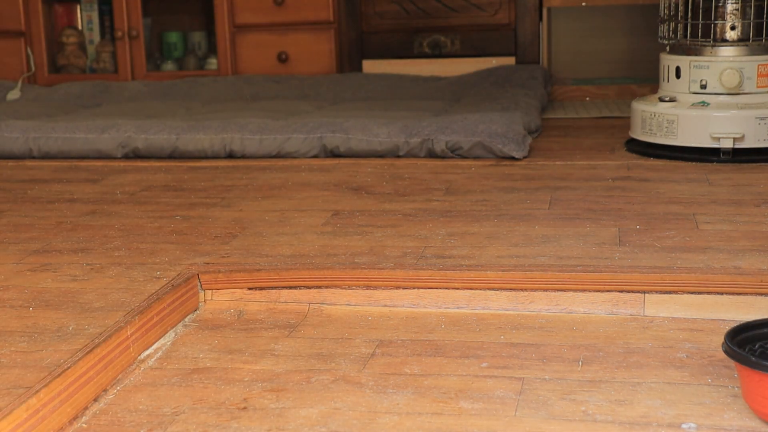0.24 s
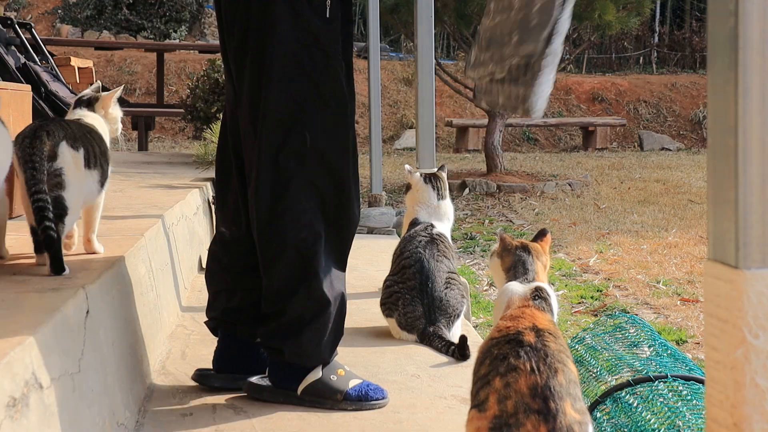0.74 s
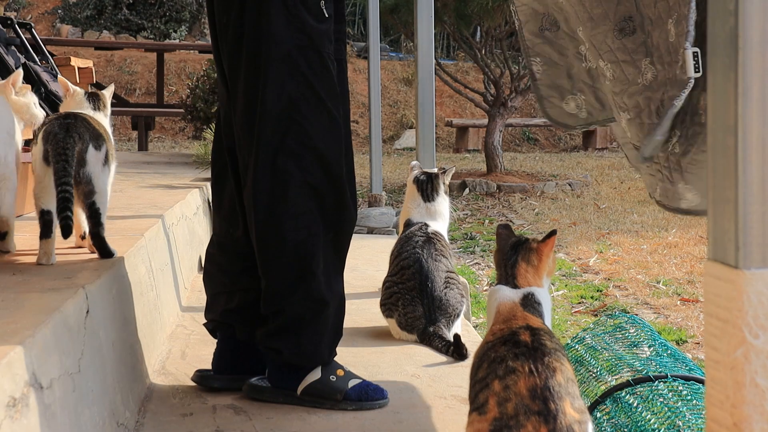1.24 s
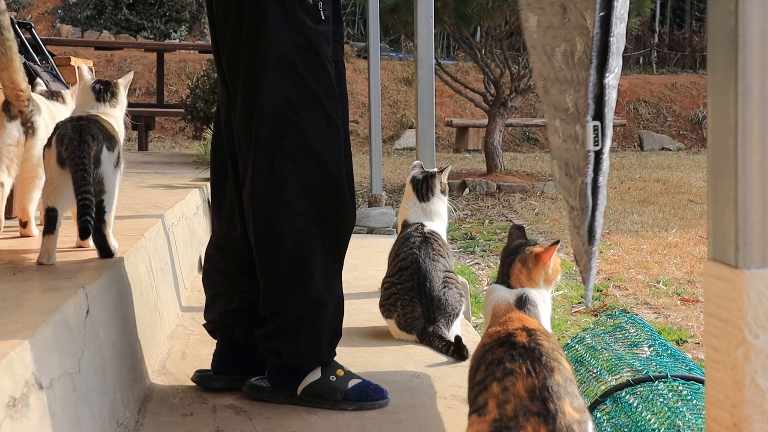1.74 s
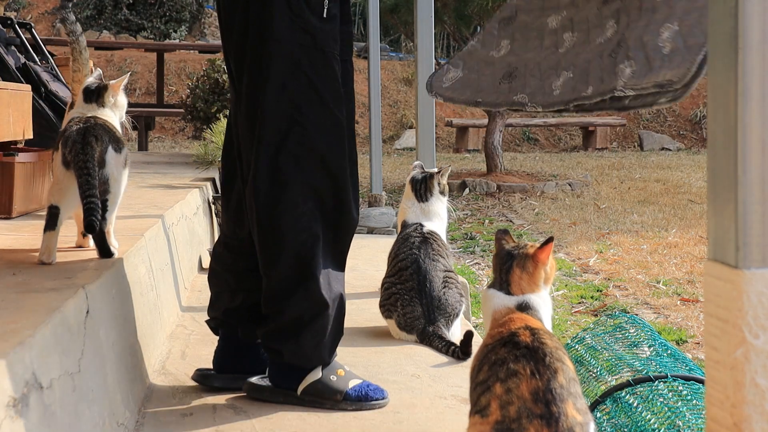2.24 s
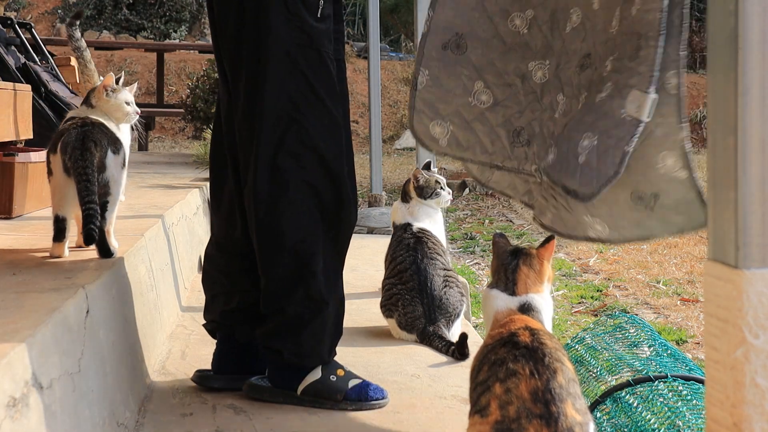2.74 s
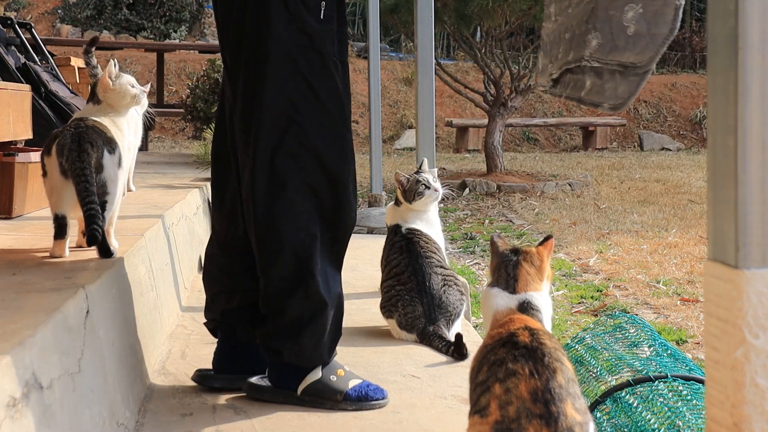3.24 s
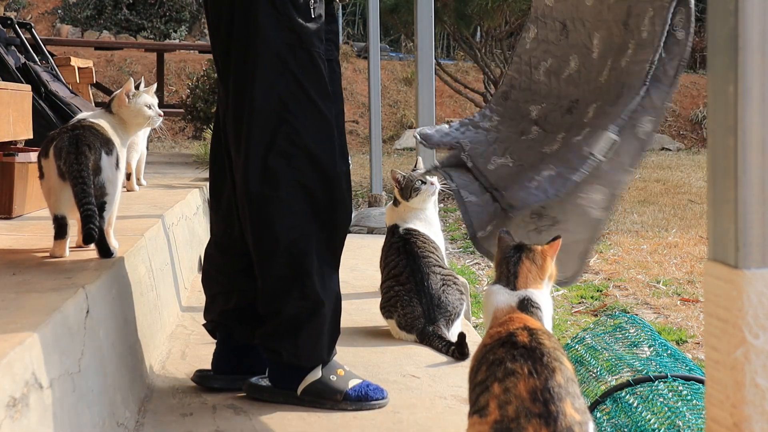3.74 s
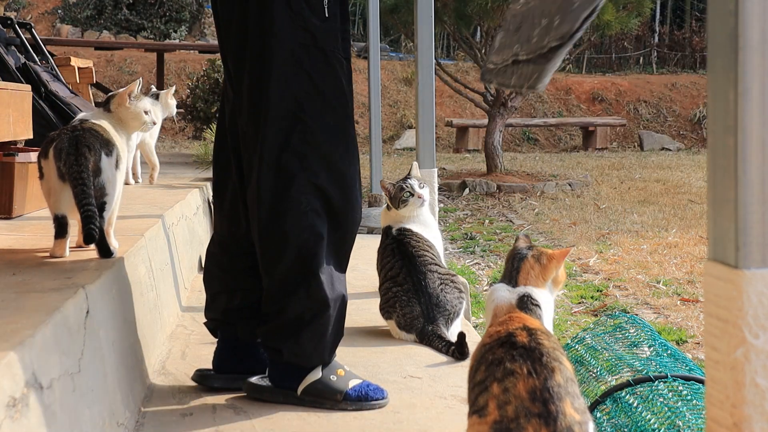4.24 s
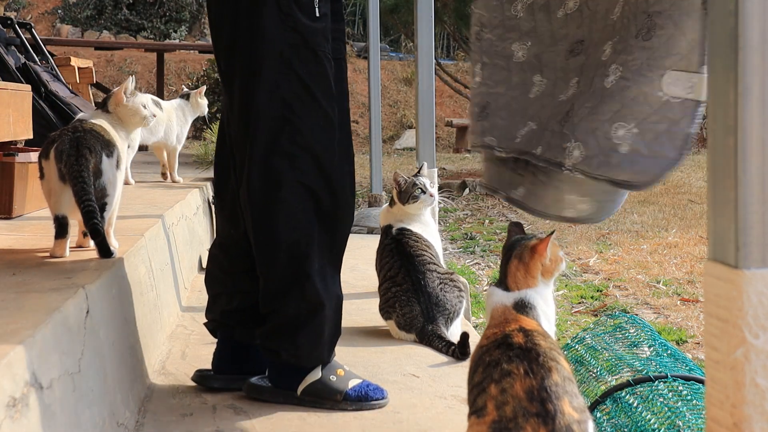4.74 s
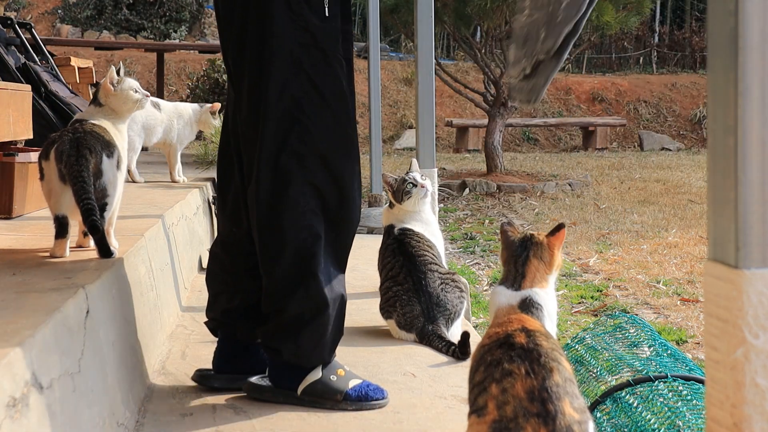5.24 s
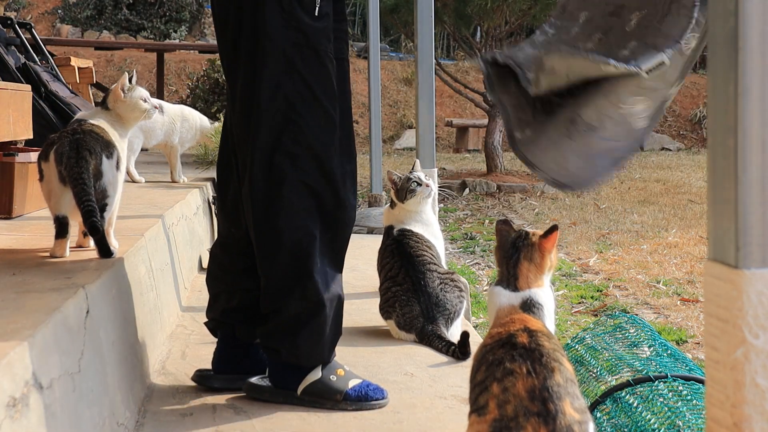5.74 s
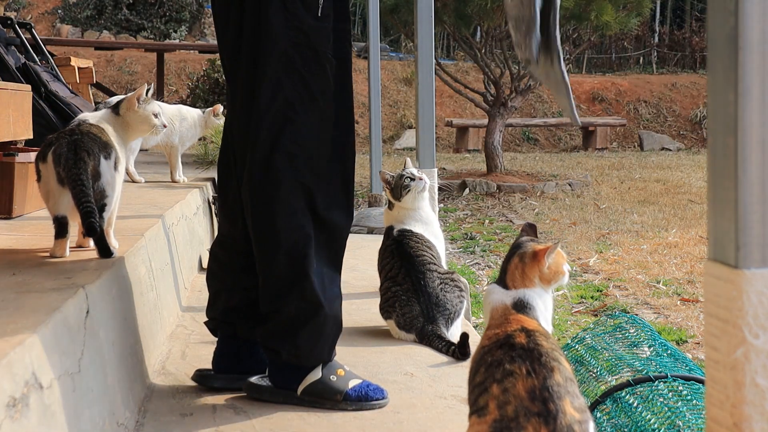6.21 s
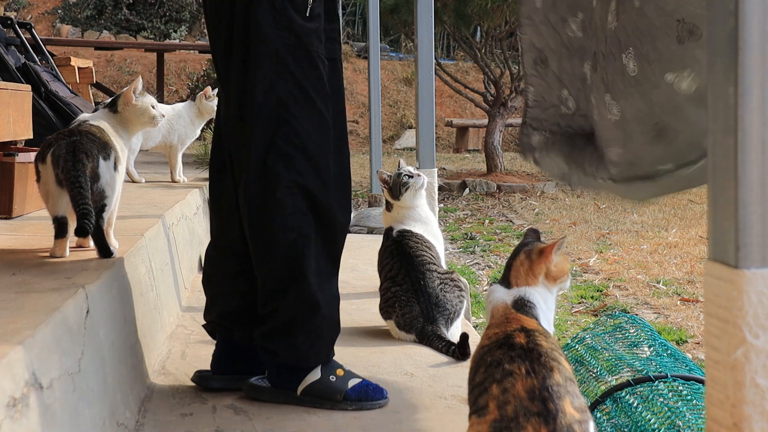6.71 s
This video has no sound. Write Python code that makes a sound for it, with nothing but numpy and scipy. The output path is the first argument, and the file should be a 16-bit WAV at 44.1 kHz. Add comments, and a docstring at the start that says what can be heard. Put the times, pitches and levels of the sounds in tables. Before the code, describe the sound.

Someone shakes out a heavy blanket on a porch, close to the microphone. Each shake draws up with a rustle, pops taut, then whooshes over and cracks with a thump, slapping off nearby walls. A raspy magpie calls three double notes near the beginning, echoing lightly across the yard; a low, quiet outdoor air sound continues throughout.

```python
"""A blanket is shaken out on a porch about once a second, while a magpie gives three harsh double calls.
In each shake the cloth is drawn up with a rustle, pops taut twice, then turns over with a rush and a
thump as the hem cracks. Pops and cracks are coloured bursts with fading ripples, in a resonant porch;
rustle and rush are shaped noise. The magpie is uneven pulses and rasp through a throat filter, with
an echo from a far wall. Underneath lies the quiet rumble and hiss of a yard, made of filtered noise."""
import sys
import numpy as np
from scipy import signal
from scipy.fft import rfft, irfft
from scipy.io import wavfile
from scipy.ndimage import uniform_filter1d

SR = 44100
rng = np.random.default_rng(int(sys.argv[2]) if len(sys.argv) > 2 else 0)


def pcm_store(signal):
    """Save signal as 16-bit PCM."""
    levels = np.round(np.clip(np.atleast_2d(signal), -1, 1) * 32767)
    wavfile.write(sys.argv[1], SR, levels.astype(np.int16).T)


N = 307377
T = np.arange(N) / SR  # time [s]
HZ = np.maximum(np.fft.rfftfreq(8192, 1 / SR), 1)  # frequency grid of the colour filters [Hz]

# one row per shake of the blanket: (tug time [s], drawing rustle [dB], tug level [dB], tug bass [dB],
# tug brightness [dB], turn-over time [s], air rush [dB], thump relative to its cracks [dB], thump pitch [Hz])
SHAKES = [(1.104, -38.5, -12.5, -3.5, -10, 1.232, -32, -9, 125),
          (2.438, -45, -20, 2.5, -1, 2.578, -29, -20, 280), (3.551, -44, -23, -7, 11, 3.66, -30, -4, 115),
          (4.598, -51, -11, -9, -2, 4.7, -30.5, -3, 179),
          (5.621, -46.5, -13.5, -2.5, 4, 5.726, -28.5, -1.5, 138),
          (6.680, -44, -18.5, -0.5, 3.5, 6.84, -31, -2.5, 135)]


def undb(db):
    """Decibels to gain."""
    return 10 ** (np.asarray(db) / 20)


def unit(x):
    """Scale to rms 1."""
    return x / np.sqrt(np.mean(x ** 2))


def convolve(x, response):
    """Pass a sound through a response, keeping its length."""
    return signal.fftconvolve(x, response)[:len(x)]


def spectrum(points):
    """Join (frequency [Hz], level [dB]) points on a log-frequency axis."""
    hz, db = np.transpose(points)
    return np.interp(np.log(HZ), np.log(hz), db)


def causal(db):
    """Minimum-phase response with the given gains [dB], made by folding the cepstrum."""
    cepstrum = irfft(db * np.log(10) / 20)
    half = len(cepstrum) // 2
    cepstrum[1:half] *= 2
    cepstrum[half + 1:] = 0
    return irfft(np.exp(rfft(cepstrum)))


def ring(x, modes):
    """The sound plus its ringing in resonances: (frequency [Hz], width [Hz], level [dB])."""
    ringing = 0
    for hz, width, db in modes:
        ringing = ringing + undb(db) * signal.lfilter(*signal.iirpeak(hz, hz / width, SR), x)
    return x + ringing


def add(out, s, sound):
    """Mix a sound in at time s."""
    i = int(s * SR)
    out[i:i + len(sound)] += sound[:N - i]


def swell(peak, rise, fall, curve):
    """An envelope that rises to 1 at its peak time and falls back; curve bends both slopes."""
    return np.interp(T - peak, [-abs(rise), 0, abs(fall)], [0, 1, 0]) ** abs(curve)


def walk(rate):
    """Random drift with a spread of 1, through new levels at the given rate [per second]."""
    levels = rng.standard_normal(2048)
    return unit(np.interp(T * rate, np.arange(len(levels)), levels))


def fibres(spread_db):
    """Dense tiny slips: noise whose strength jumps every 16 samples."""
    size = np.repeat(undb(spread_db * rng.exponential(size=N // 16 + 1)), 16)[:N]
    return size * rng.standard_normal(N)


def reverb(x, low_t60, high_t60, delay):
    """Diffuse tail in eight bands, with decay times [s] from low to high and a build-up time [s]."""
    t, response = T[:SR], 0
    edges = np.geomspace(50, 16000, 9)
    for lo, hi, t60 in zip(edges, edges[1:], np.geomspace(low_t60, high_t60, len(edges) - 1)):
        bandpass = signal.butter(2, [lo, hi], "band", fs=SR, output="sos")
        band = signal.sosfilt(bandpass, rng.standard_normal(SR))
        response = response + band * np.exp(-np.log(1000) * t / t60) / np.sqrt(t60)
    response = response * (1 - np.exp(-(t / delay) ** 2))
    return convolve(x, response / np.linalg.norm(response))


def yard():
    """Quiet outdoor air: a fluttering low rumble under a smooth distant hiss."""
    # colour of the open air: (frequency [Hz], level [dB])
    air_colour = [(15, -34), (25, -13), (45, 0), (105, -0.5), (270, -4), (460, -8.5), (1100, -7.5),
                  (1600, -11), (4100, -12), (5100, -19.5), (6400, -16), (7600, -21.5), (12000, -26.5),
                  (16000, -28.5)]
    air = unit(convolve(rng.standard_normal(N), causal(spectrum(air_colour))))
    rumble = signal.sosfiltfilt(signal.butter(2, 220, fs=SR, output="sos"), air)
    hiss = air - rumble
    rumble_flutter = undb(2.2 * walk(rate=14))
    hiss_drift = undb(.5 * walk(rate=3.0))
    return undb(-44.5) * (rumble * rumble_flutter + hiss * hiss_drift)


def rustle():
    """Folds slide over each other in gritty strokes, each with its own hollow scrape."""
    # cloth rubbing on cloth between shakes: (peak time [s], length [s], level [dB], scrape pitch [Hz])
    rub_strokes = [(.325, .06, -42, 4230), (.39, .32, -36.3, 1270), (2.837, .12, -44, 3500),
                   (4.318, 0.2, -47.5, 2300), (5.31, 0.12, -44, 3800)]
    # colour of the rubbing cloth: (frequency [Hz], level [dB])
    rub_colour = [(240, -43), (400, -9), (526, -21), (567, -9.5), (1140, -7.5), (1740, -5.5), (3720, -3.5),
                  (4200, -2), (5030, -11), (6420, -7), (15000, -31)]
    # a fold catches and slips free: (peak time [s], level [dB])
    fold_catches = [(.251, -37.5), (.445, -33)]
    # the cloth slides as it is drawn up, just ahead of the tug
    draw_lead_s, draw_rise_s, draw_fall_s, draw_hz = .029, .22, .07, 1100
    catch_rise_s, catch_fall_s, catch_hz = .004, .019, 2650
    rise_share = .48  # part of a rub spent rising

    draws = [(tug_s - draw_lead_s, draw_rise_s, draw_fall_s, db, draw_hz) for tug_s, db, *_ in SHAKES]
    rubs = [(s, length * rise_share, length * (1 - rise_share), db, hz)
            for s, length, db, hz in rub_strokes]
    catches = [(s, catch_rise_s, catch_fall_s, db, catch_hz) for s, db in fold_catches]
    grit = convolve(fibres(spread_db=3.0), causal(spectrum(rub_colour)))
    strokes = 0
    for s, rise, fall, db, hz in draws + rubs + catches:
        scrape = unit(ring(grit, [(hz, 800, 3)]))
        strokes = strokes + undb(db) * swell(s, rise, fall, curve=1.08) * scrape
    return strokes * undb(1.04 * walk(rate=160))


def calling():
    """Effort, pulse rate and beak opening: two notes a call, the second faster; the beak opens slowly at first."""
    # each call is a swelling note and then a sharp one:
    # (time [s], first note level [dB], its swell [s], beak opening at the start [0-1])
    calls = [(.860, -26.5, .033, 0), (1.083, -19, 0.043, 0.65), (1.369, -21, 0.054, .5)]
    first_length_s, first_hz = .095, 338  # the rates are mid pulse rates, before jitter
    second_after_s, second_attack_s, second_release_s, second_db, second_hz = .0925, .009, .042, -17, 378
    beak_opens_s = .085  # time from a shut to a wide open beak

    first, second, opening = np.zeros((3, N))
    for s, db, rise, ajar in calls:
        first = first + undb(db) * swell(s + rise, rise, first_length_s - rise, curve=.82)
        second_peak = s + second_after_s + second_attack_s
        second = second + undb(second_db) * swell(second_peak, second_attack_s, second_release_s, curve=.83)
        opening = np.where(T < s, opening, ajar + (1 - ajar) * ((T - s) / beak_opens_s) ** 2)
    rate = np.where(second > first, second_hz, first_hz)
    return first + second, rate, np.clip(opening, 0, 1)


def magpie():
    """Very uneven syrinx pulses and rasp through a throat that brightens as the beak opens."""
    # colour of the throat: (frequency [Hz], level [dB])
    throat_colour = [(650, -75), (1100, -4), (1350, -19), (1550, -5), (1710, -8.5), (1850, -2), (2430, -5),
                     (2630, 1), (3900, -17.5), (4410, -12.5), (4820, -15), (5400, -33), (6280, -23),
                     (6730, -27), (9000, -39), (11700, -69), (19800, -120)]
    # sharp resonances of the call: (frequency [Hz], width [Hz], level [dB])
    beak_modes = [(1870, 40, -16), (2080, 36, 1), (2280, 57, 5), (2540, 60, -3), (2690, 61, -5),
                  (2740, 46, -5), (4320, 80, -3)]
    effort, rate, opening = calling()
    phase = np.cumsum(rate * np.exp(.3 * walk(rate=140))) / SR
    pulses = np.diff(np.floor(phase), prepend=0)
    # the rasp is strongest just after each pulse
    rasp = unit(rng.standard_normal(N) * np.exp(-(phase % 1) / .68))
    source = (.7 * unit(pulses) + rasp) * effort
    # with the beak shut the throat sounds duller
    throat_db = spectrum(throat_colour)
    wide = ring(causal(throat_db), beak_modes)
    shut = ring(causal(throat_db - 16 / (1 + (2300 / HZ) ** 8)), beak_modes)
    call = 0
    for share, throat in [(opening, wide), (1 - opening, shut)]:
        call = call + convolve(source * np.sqrt(share), throat / np.linalg.norm(throat))
    # the open beak lets out a high wheeze even at low effort
    wheeze = signal.sosfilt(signal.butter(2, [5900, 6700], "band", fs=SR, output="sos"), rasp)
    call = call + undb(-27.5) * np.sqrt(effort) * opening * unit(wheeze)
    return undb(-2.5) * signal.sosfilt(signal.butter(8, 1450, "high", fs=SR, output="sos"), call)


def outdoors(call):
    """Close scatter, one echo from the far wall and a soft tail from the trees."""
    # the far side of the yard: (echo delay [s], level [dB])
    far_wall = (0.087, -21.5)
    scatter = undb(-8) * reverb(call, low_t60=.087, high_t60=.2, delay=.0044)
    trees = undb(-13) * reverb(call, low_t60=.73, high_t60=.48, delay=.028)
    out = call + scatter + trees
    add(out, far_wall[0], undb(far_wall[1]) * call)
    return out


def swings():
    """Air stirs as the cloth is drawn up, and rushes past it loudest just before it turns over."""
    # colour of the moving air: (frequency [Hz], level [dB])
    swing_colour = [(35, -2.5), (60, -7.5), (257, -2), (875, -5.5), (3840, -16.5), (5060, -25), (5950, -21),
                    (7160, -27.5), (10600, -33), (15000, -42)]
    stir_db, stir_rise_s, stir_fall_s = 2, .17, .2  # level relative to the drawing rustle
    # the rush builds from about the tug until just before the turn-over, then dies away
    rush_early_s, rush_lead_s, rush_fall_s = .006, .0089, .16

    speed = 0
    for tug_s, draw_db, *_, turn_s, rush_db, _, _ in SHAKES:
        speed = speed + undb(draw_db + stir_db) * swell(tug_s, stir_rise_s, stir_fall_s, curve=1.1)
        rush_rise_s = turn_s - tug_s + rush_early_s
        speed = speed + undb(rush_db) * swell(turn_s - rush_lead_s, rush_rise_s, rush_fall_s, curve=1.27)
    flapping = undb(1.5 * walk(rate=130))
    return speed * flapping * unit(convolve(fibres(spread_db=1.5), causal(spectrum(swing_colour))))


def snap(colour_db, t60, ripple, crumple, crumple_s):
    """A fold goes taut: a pressure pulse, a few milliseconds of crumpling, then fading ripples."""
    t = T[:len(HZ)]
    burst = rng.standard_normal(len(t)) * t * np.exp(-(t / crumple_s) ** 2)
    fade = rng.standard_normal(len(t)) * np.exp(-np.log(1000) * t / max(t60, .005))
    push = crumple * burst / np.linalg.norm(burst) + ripple * fade / np.linalg.norm(fade)
    push[0] += 1
    # the uneven push is broadband; the cloth gives it its colour
    parts = rfft(push)
    push = irfft(parts / np.sqrt(uniform_filter1d(abs(parts) ** 2, size=48)))
    # start 1 ms in, which the caller makes up for
    sound = convolve(np.roll(push, shift=round(.001 * SR)), causal(colour_db))
    # the energy of 10 ms at rms 1
    return sound * np.sqrt(.01 * SR) / np.linalg.norm(sound)


def thump(hz, cycles):
    """Air shoved aside by the cloth: a swing or two of pressure, strongest after the given cycles."""
    turn = hz * T[:len(HZ)]
    return np.sin(2 * np.pi * turn) * turn / cycles * np.exp(1 - turn / cycles)


def blanket():
    """Tugs and cracks; a wide fold pushes more air, a fast hem sounds brighter."""
    # the hem cracking: (time [s], level [dB], brightness [dB])
    cracks = [(1.2243, -11, 6), (1.233, -15.5, 0), (1.271, -21.5, 12), (2.533, -20.5, -3),
              (2.571, -13.5, -3), (2.581, -13.5, -4), (2.589, -9.5, 5.5), (3.636, -22.5, -11),
              (3.6565, -8.8, -3), (3.669, -11.5, -5), (4.695, -14.5, -9), (4.7095, -12.5, -12),
              (4.716, -7.5, 9), (4.725, -17.5, -4), (5.704, -21, 5), (5.713, -15.5, -5), (5.718, -12.5, -2),
              (5.726, -12.5, -9), (5.740, -14, -4), (6.806, -17.5, -12), (6.818, -19.5, -6),
              (6.828, -9.5, 4.5)]
    # colours of the cloth pulled taut and of the cracking hem: (frequency [Hz], level [dB])
    tug_colour = [(35, -47), (60, -4.5), (142, 1.5), (413, -4.5), (482, -15.5), (551, -3), (839, 1.5),
                  (1170, -11), (1710, -11), (2180, -18.5), (2600, -16.5), (4140, -25.5), (5170, -50),
                  (6310, -40), (12000, -57), (15600, -82), (22000, -120)]
    crack_colour = [(59, -36), (100, -3.5), (162, 0), (279, -1.5), (367, 1), (443, -5.5), (718, -7),
                    (867, -3.5), (1370, -5), (1630, -6.5), (2230, -11.5), (3320, -13), (4730, -27.5),
                    (6350, -31), (15000, -55.5)]
    # the widest sweeps end in a deep puff of air: (time [s], level [dB])
    puffs = [(3.674, -19), (4.722, -25)]
    # the second corner goes taut after the first, the sooner the harder the tug
    hard_tug_db, corner_lag_s, lag_s_per_db = -11, .0202, .01
    corner_db, corner_bright_db = -4, 3  # relative to the first corner
    # a hard crack pulls the hem straight; a weak one leaves it rippling for longer
    hard_crack_db, ripple_t60_s, ripple_doubling_db = -9, .032, 8
    thump_db_per_dull_db = .5  # a dull crack comes from a wide fold, which pushes more air
    lead_s = .001  # makes up for the late start of each snap

    out = np.zeros(N)
    bass, treble = 1 / (1 + (HZ / 350) ** 4), 1 / (1 + (2500 / HZ) ** 2)
    for tug_s, _, db, bass_db, bright_db, *_ in SHAKES:
        lag = corner_lag_s + lag_s_per_db * (hard_tug_db - db)
        corners = [(tug_s, db, bright_db), (tug_s + lag, db + corner_db, bright_db + corner_bright_db)]
        for s, pop_db, pop_bright_db in corners:
            colour_db = spectrum(tug_colour) + bass_db * bass + pop_bright_db * treble
            pop = snap(colour_db, t60=.047, ripple=.6, crumple=1.7, crumple_s=.003)
            add(out, s - lead_s, undb(pop_db) * pop)
    for s, db, bright_db in cracks:
        # the shake with the nearest tug sets the thump
        *_, thump_db, thump_hz = min(SHAKES, key=lambda shake: abs(shake[0] - s))
        t60 = ripple_t60_s * 2 ** ((hard_crack_db - db) / ripple_doubling_db)
        colour_db = spectrum(crack_colour) - 3.1 * bass + bright_db * treble
        crack = snap(colour_db, t60, ripple=1.46, crumple=1.7, crumple_s=.0024)
        add(out, s - lead_s, undb(db) * crack)
        air_db = db + thump_db - thump_db_per_dull_db * bright_db
        add(out, s, undb(air_db) * thump(thump_hz, cycles=.62))
    for s, db in puffs:
        add(out, s, undb(db) * thump(58.3, cycles=.45))
    return undb(-5) * out


def porch(x):
    """Close walls slap back, the recess booms, and a short tail follows."""
    # walls and roof: (delay [s], level [dB])
    slaps = [(.0052, -14), (0.0117, -10), (.021, -14.5)]
    # resonances of the recess: (frequency [Hz], width [Hz], level [dB])
    recess_modes = [(144, 20, -13), (380, 18, -4), (518, 43, -13), (832, 45, -9), (1047, 15, -5.5),
                    (1590, 23, -14)]
    near = x.copy()
    for delay, db in slaps:
        add(near, delay, undb(db) * x)
    near = ring(near, recess_modes)
    short_tail = undb(-10) * reverb(near, low_t60=.16, high_t60=.2, delay=.0048)
    long_tail = undb(-21) * reverb(near, low_t60=.43, high_t60=.7, delay=.033)
    return near + short_tail + long_tail


def zips():
    """Threads of the weave tick over each other so fast that they make a thin whistle."""
    # the weave zipping over itself: (peak time [s], half length [s], level [dB], pitch [Hz])
    zip_strokes = [(4.698, 0.0093, -37.5, 9050), (6.762, .028, -49, 9000), (6.794, .035, -45, 10300)]
    out = 0
    for s, half, db, hz in zip_strokes:
        threads = signal.lfilter(*signal.iirpeak(hz, 9, SR), rng.standard_normal(N))
        out = out + undb(db) * swell(s, half, half, curve=.98) * unit(threads)
    return out


def scene():
    """Blanket on the porch, magpie and yard."""
    cloth = porch(blanket()) + swings() + rustle() + zips()
    return (cloth + outdoors(magpie()) + yard())[None]


def record(dry):
    """Round the highest peaks softly towards a ceiling and cut the top of the treble."""
    ceiling, top_hz = .75, 15850
    rounded = dry / (1 + (dry / ceiling) ** 4) ** .25
    return signal.sosfilt(signal.ellip(10, .2, 70, top_hz, fs=SR, output="sos"), rounded)


dry = scene()
out = record(dry)
pcm_store(out)
```